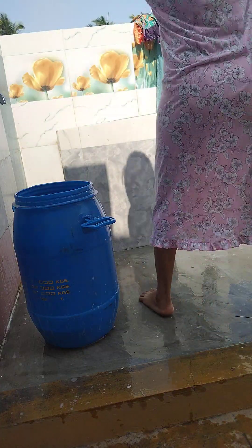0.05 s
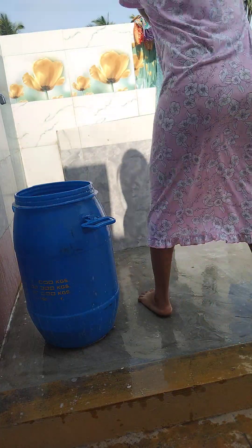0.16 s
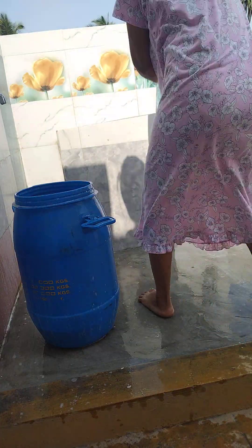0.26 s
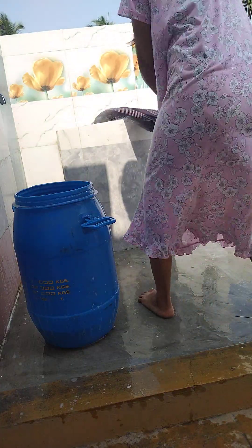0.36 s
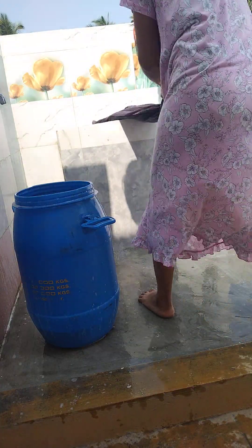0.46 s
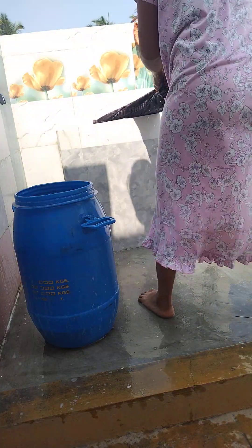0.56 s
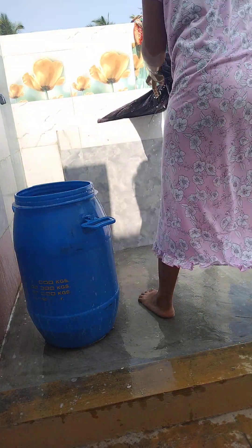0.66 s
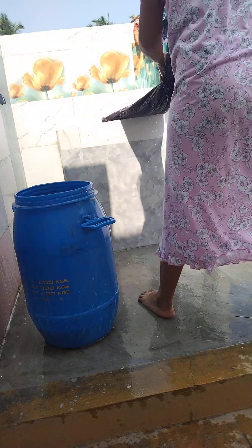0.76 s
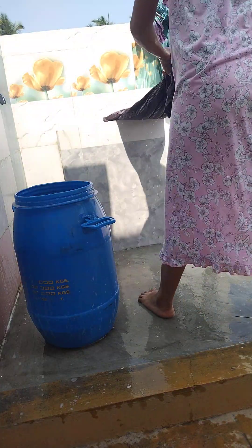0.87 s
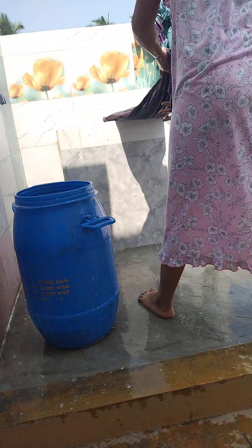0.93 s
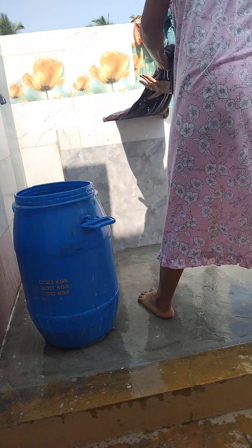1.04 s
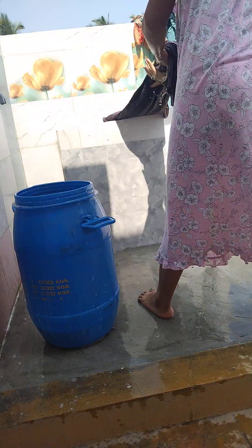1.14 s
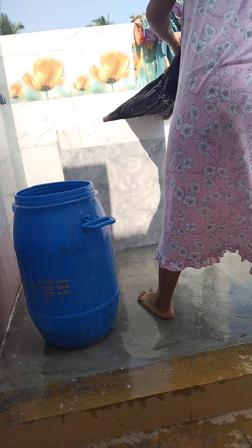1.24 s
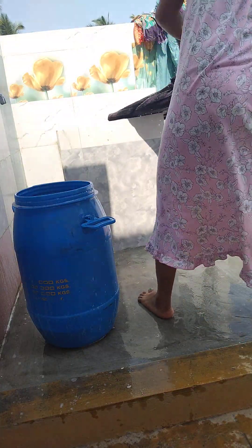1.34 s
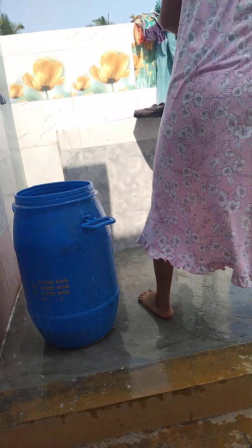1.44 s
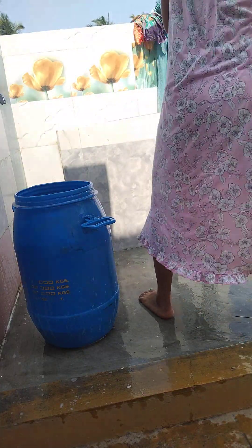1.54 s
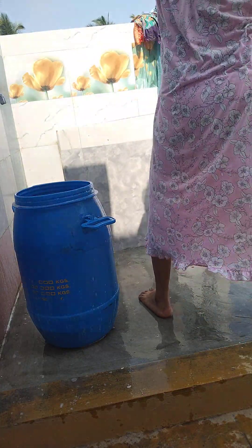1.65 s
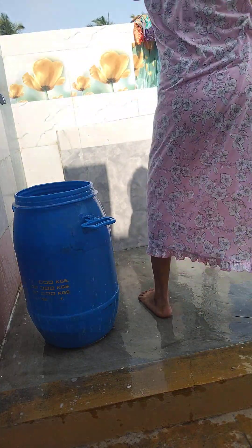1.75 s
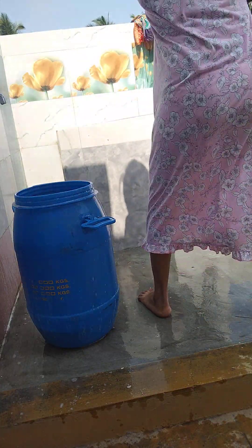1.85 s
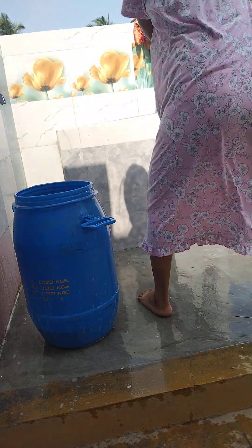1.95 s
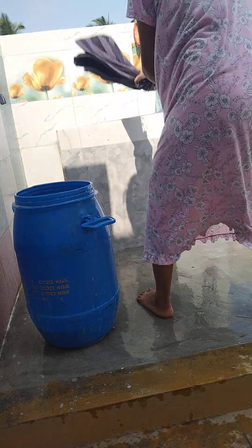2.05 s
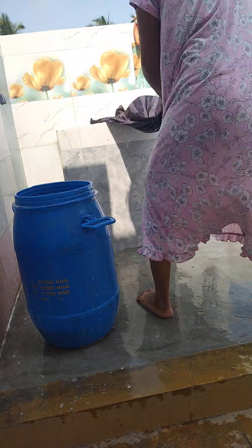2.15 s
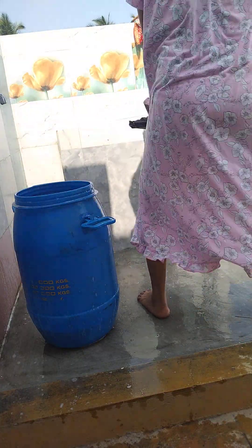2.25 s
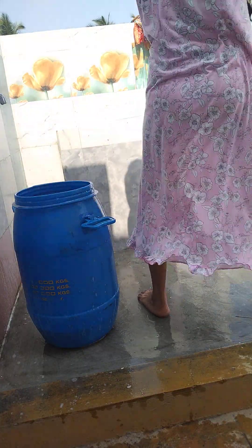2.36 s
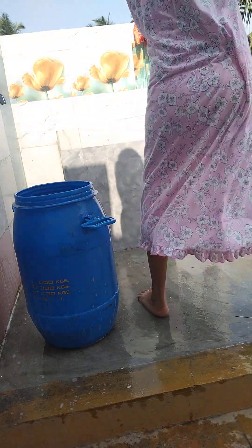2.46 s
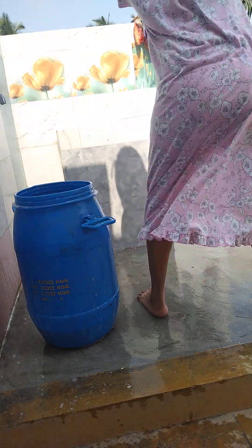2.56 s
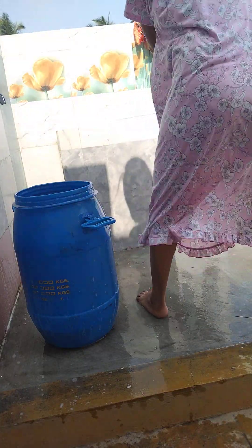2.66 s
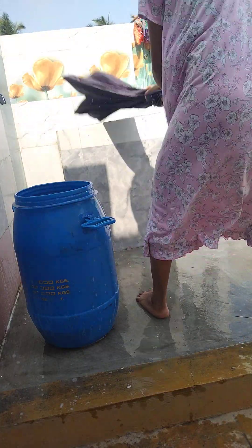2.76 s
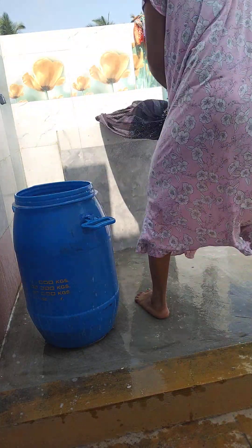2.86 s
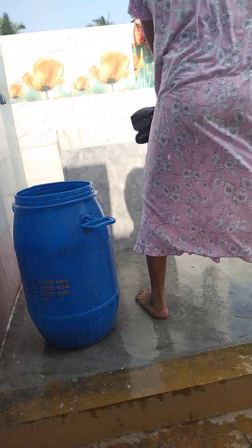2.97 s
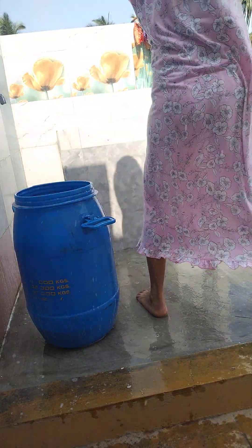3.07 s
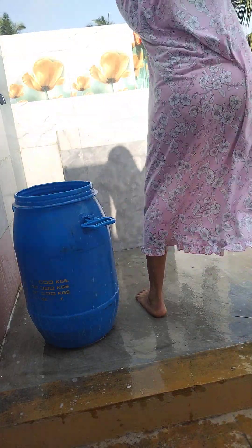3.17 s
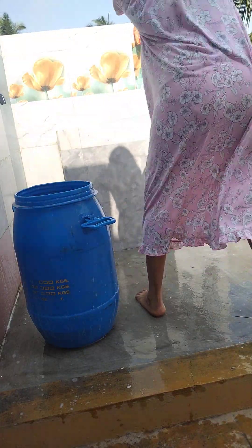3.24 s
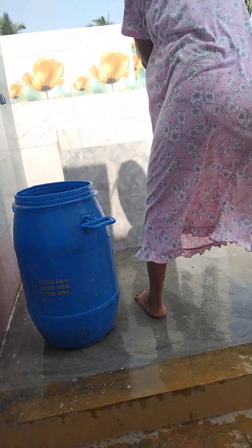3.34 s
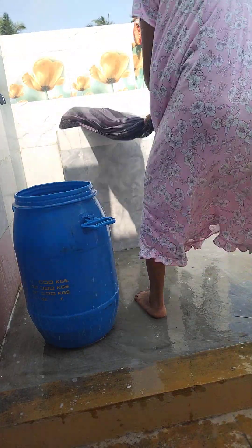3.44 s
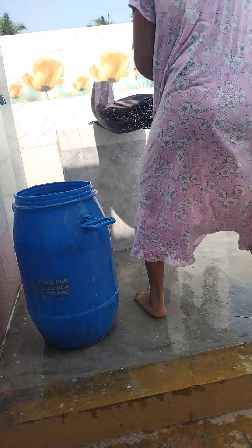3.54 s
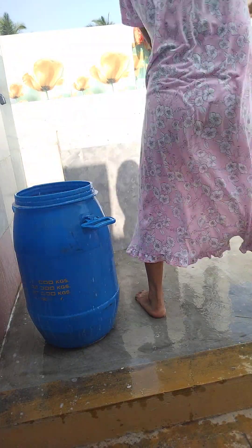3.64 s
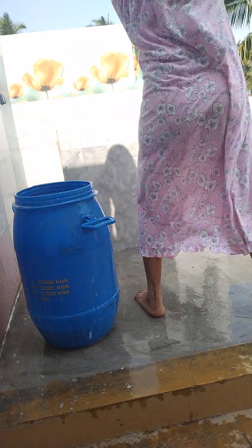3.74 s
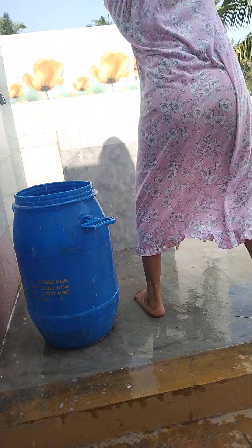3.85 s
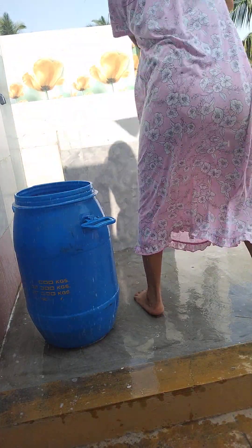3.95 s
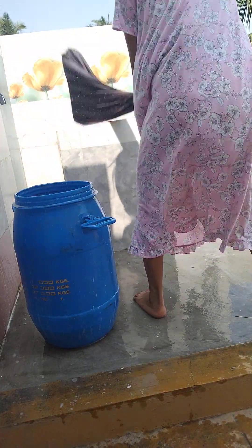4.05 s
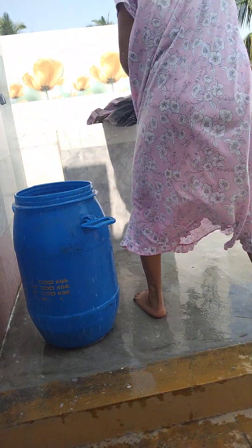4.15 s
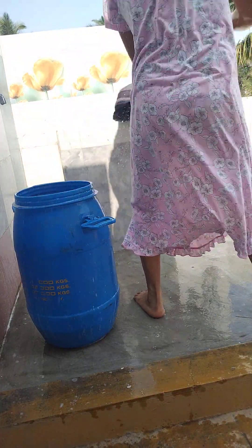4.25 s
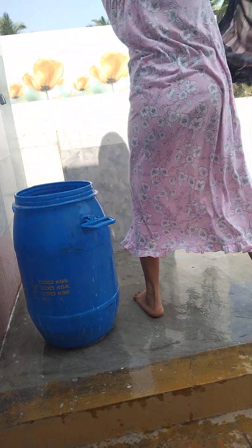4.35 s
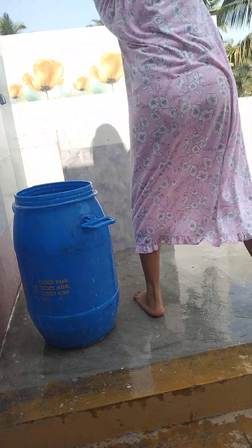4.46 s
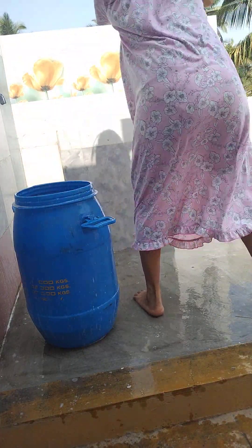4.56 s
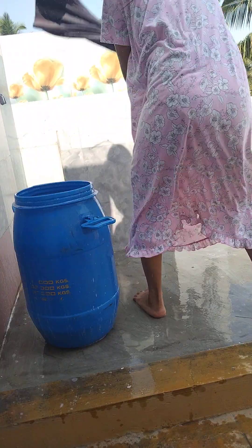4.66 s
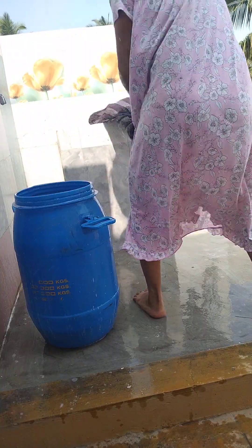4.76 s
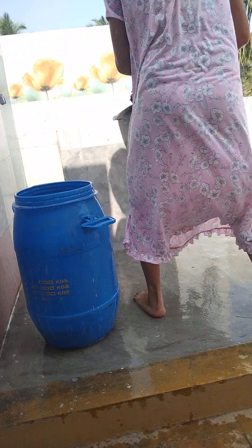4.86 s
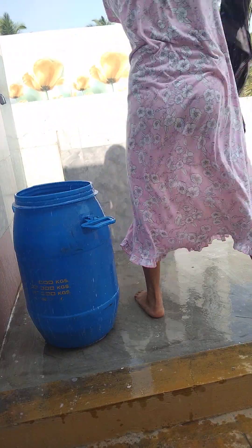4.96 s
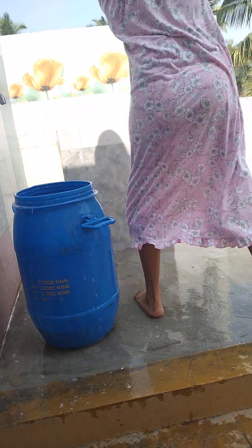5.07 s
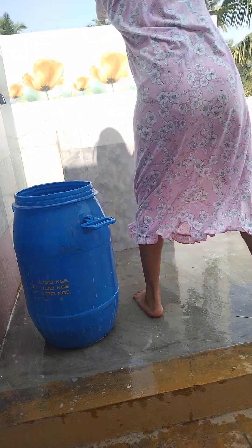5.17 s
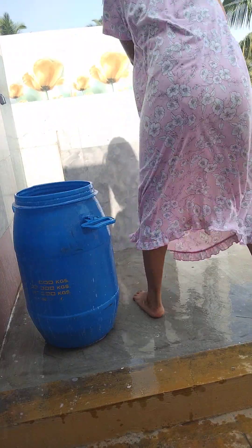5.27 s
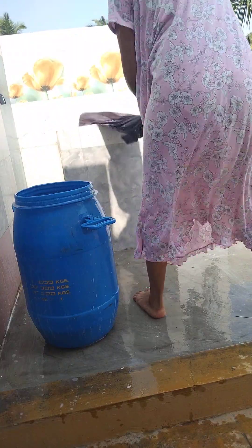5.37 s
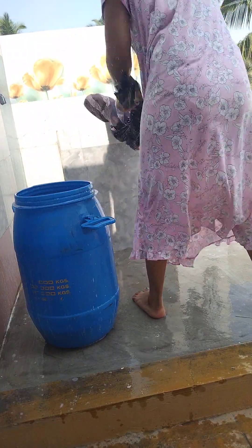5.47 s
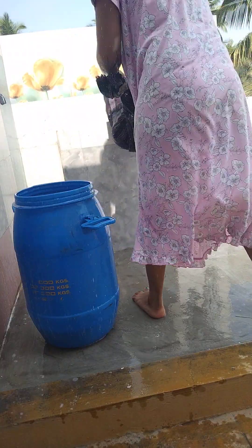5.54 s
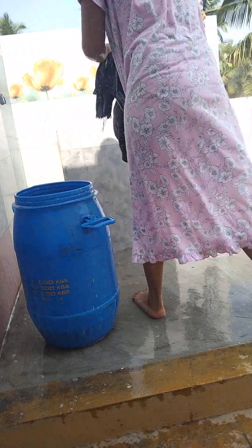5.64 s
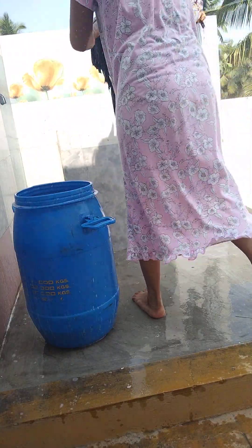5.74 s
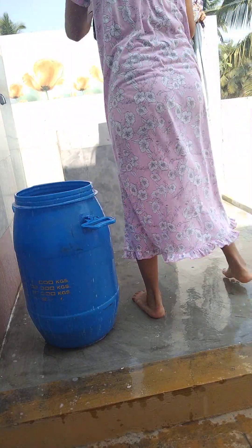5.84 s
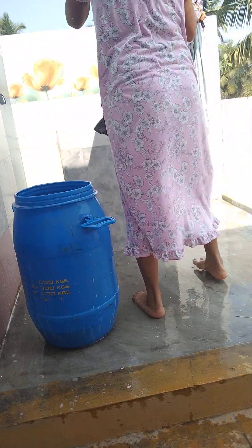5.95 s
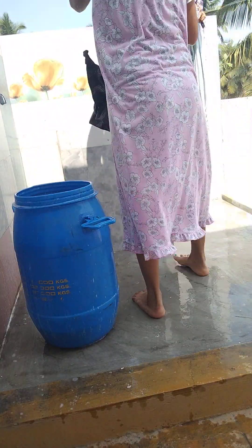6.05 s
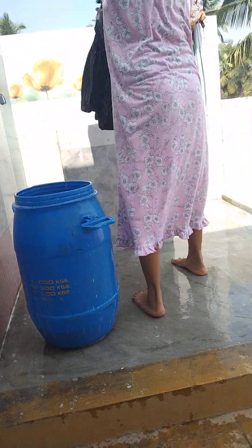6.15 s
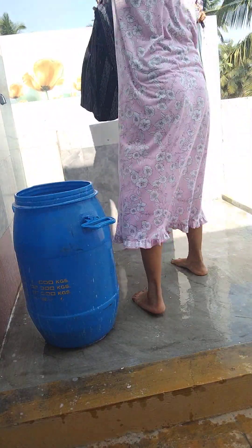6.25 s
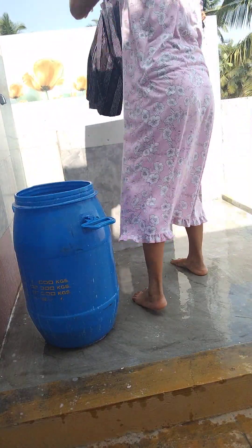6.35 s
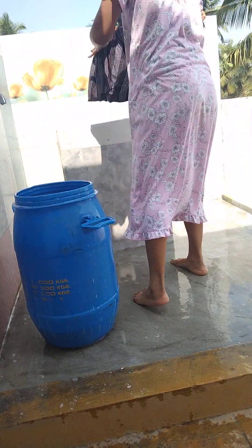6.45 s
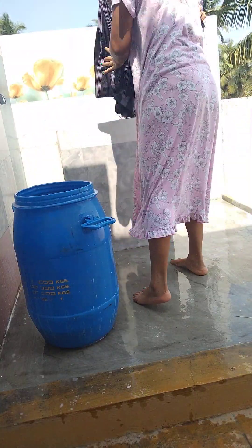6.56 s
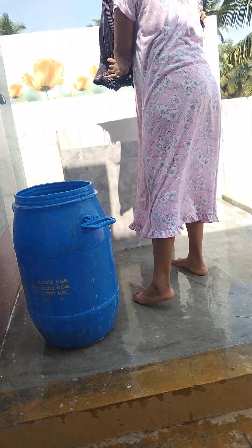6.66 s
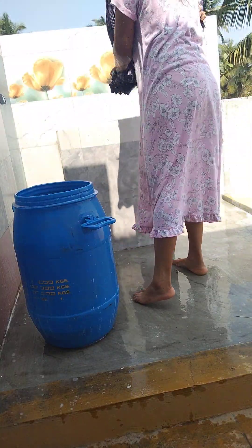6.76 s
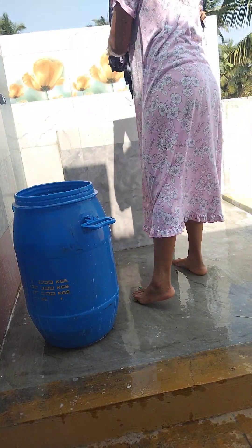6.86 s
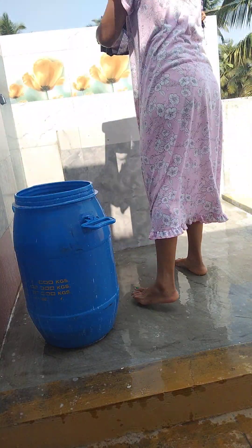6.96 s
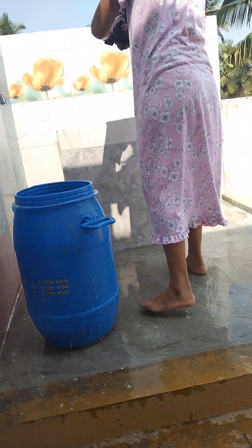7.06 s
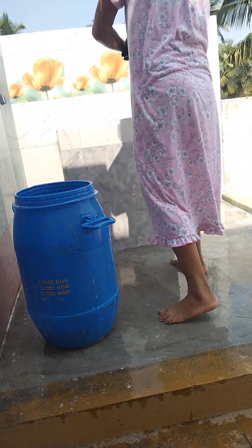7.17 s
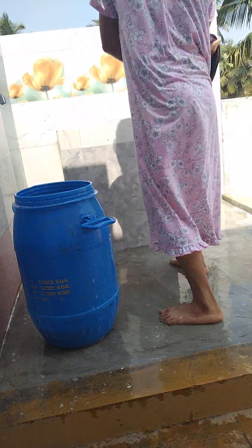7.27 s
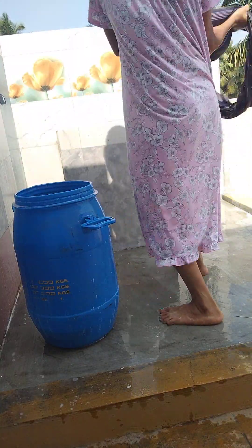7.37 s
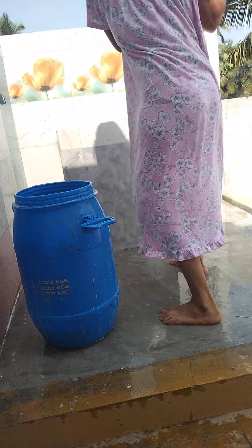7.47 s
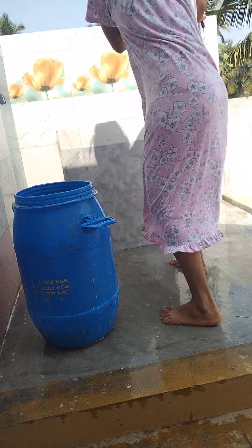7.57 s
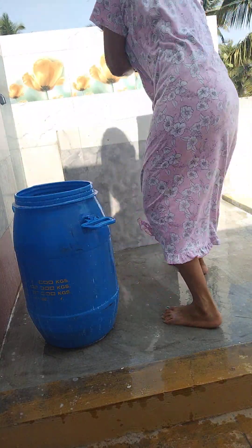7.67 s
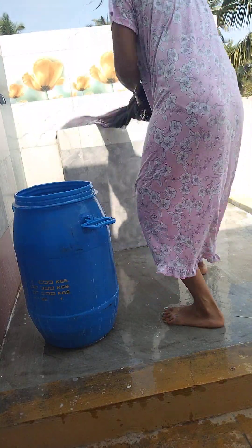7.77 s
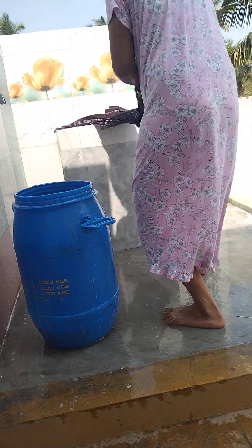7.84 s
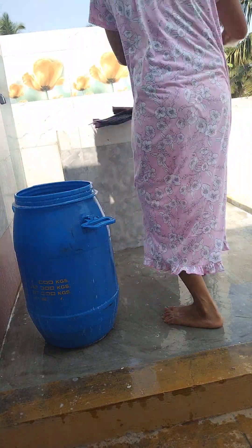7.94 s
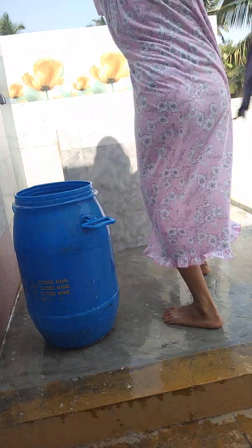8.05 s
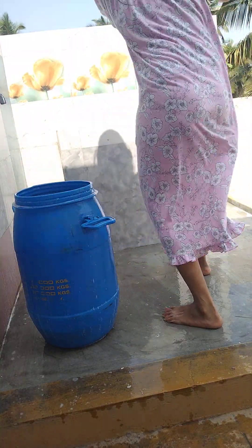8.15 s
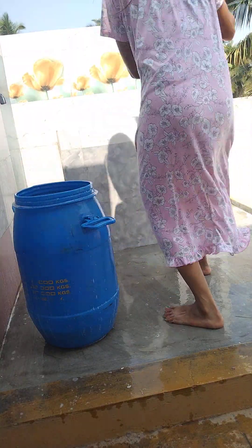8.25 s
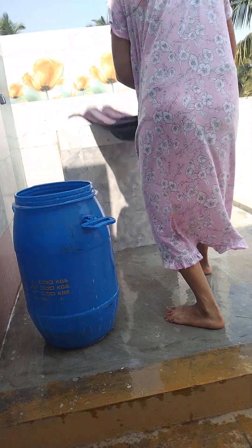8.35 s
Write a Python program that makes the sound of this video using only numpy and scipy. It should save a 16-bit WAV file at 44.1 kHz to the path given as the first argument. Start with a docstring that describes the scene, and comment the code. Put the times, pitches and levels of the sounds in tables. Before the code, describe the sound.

Wet cloth is slapped against a stone slab in a walled outdoor corner. One blow comes first, then after a gap six follow at an even pace, each a close smack with a thud, spray and a short echo. The cloth rustles and drips between them. In a pause with soft pats, a faint distant engine speeds up and settles, before one last slap.

```python
"""A distant engine hums under faint warbling hiss; then wet cloth rustles in and slaps on a stone
washing slab in a walled corner. Each blow squeezes out air and spray; the walls answer and an open
plastic barrel booms. The cloth drags back over the stone and sheds drips, with soft pats of cloth and
bare feet between blows. Late on, the engine speeds up and drops back to idle."""
import sys
import numpy as np
from scipy import signal
from scipy.fft import rfft, irfft, next_fast_len
from scipy.io import wavfile
from scipy.ndimage import uniform_filter1d, map_coordinates

SR = 44100
rng = np.random.default_rng(int(sys.argv[2]) if len(sys.argv) > 2 else 0)


def wav_out(sig):
    """Save sig, one row per channel (or a flat mono array), as 16-bit PCM at SR to the path in sys.argv[1]."""
    wavfile.write(sys.argv[1], SR, np.round(np.clip(np.atleast_2d(sig).T, -1, 1) * 32767).astype(np.int16))


N = 370881
CLOCK_S = np.arange(N) / SR
AGE_S = np.arange(SR) / SR  # time within one event
BINS_HZ = np.fft.rfftfreq(2 * SR, 1 / SR)


def amp(db):
    return 10 ** (np.asarray(db) / 20)


def unit_rms(x):
    return x / np.sqrt(np.mean(x ** 2) + 1e-20)


def along(points, hz):
    """Interpolate (freq_hz, value) rows on a log axis."""
    freqs, values = np.transpose(points)
    return np.interp(np.log(hz + 1), np.log(freqs + 1), values)


def curves(rows):
    """Per-sample curve for each column after time_s."""
    times, *columns = np.transpose(rows)
    return [np.interp(CLOCK_S, times, column) for column in columns]


def wobble(rate_hz, size=N):
    """Smooth random curve."""
    knots = rng.standard_normal(int(size * rate_hz / SR) + 4)
    return map_coordinates(knots, [np.arange(size) * rate_hz / SR])


def fade(t, t60_s):
    return np.exp(-np.log(1000) * np.maximum(t, 0) / t60_s)


def peak_db(hz, centre_hz, width_hz, gain_db):
    return gain_db / (1 + (2 * (hz - centre_hz) / width_hz) ** 2)


def add(track, start_s, sound):
    part = track[max(round(start_s * SR), 0):][:len(sound)]
    part += sound[:len(part)]


def filtered(x, gain_at_hz):
    size = next_fast_len(N + SR // 2)
    return irfft(rfft(x, size) * gain_at_hz(np.fft.rfftfreq(size, 1 / SR)), size)[:N]


def burst(drive, colour_db):
    """Minimum-phase filtered drive, scaled to the energy of 15 ms at rms 1."""
    cepstrum = irfft(np.log(amp(colour_db)))
    cepstrum[1:SR] *= 2
    cepstrum[SR + 1:] = 0
    x = irfft(rfft(drive, 2 * SR) * np.exp(rfft(cepstrum)))[:SR]
    return x * np.sqrt(.015 * SR / np.sum(x ** 2))


def crackle(clump_db, rate_hz, size=SR):
    """Noise in clumps: fold after fold, drop after drop."""
    return rng.standard_normal(size) * amp(clump_db * wobble(rate_hz, size))


def patchy(x, depth_db):
    """Shift the colour in narrow, short-lived patches."""
    spectra = signal.stft(x, nperseg=1024)[2]
    field = uniform_filter1d(rng.standard_normal(spectra.shape), size=4, axis=0)
    field = uniform_filter1d(field, size=9, axis=1)
    return signal.istft(spectra * amp(depth_db * unit_rms(field)), nperseg=1024)[1][:N]


def stroke(peak_s, rise_t60_s, hold_s, fall_t60_s):
    """Gesture envelope: swell, hold, decay."""
    return fade(peak_s - CLOCK_S, rise_t60_s) * fade(CLOCK_S - peak_s - hold_s, fall_t60_s)


# Exhaust spectrum: freq_hz, gain_db
EXHAUST_SPECTRUM = [(30, -34), (55, -25.5), (70, -8), (100, -6), (135, 2.5), (165, -1), (195, -7),
                    (240, -21), (350, -38), (600, -58.5)]
# Engine run: time_s, firing_hz, level_db
ENGINE_RUN = [(0, 26.4, -57.5), (.3, 26.5, -67), (.7, 25.6, -48.5), (1.02, 25.1, -65.5),
              (1.18, 25.1, -49.5), (1.45, 24.3, -59), (1.85, 23.5, -56), (2.1, 24.5, -53.5),
              (3.3, 29.2, -54.5), (3.9, 27.1, -51), (5.85, 30.9, -53), (6.04, 31.6, -44.5),
              (6.48, 33.4, -41.5), (6.8, 27, -53.5), (7.25, 26.4, -59.5), (7.65, 26.5, -52),
              (8.41, 26.6, -58.5)]


def engine(waver_db=4.0, rumble_db=-8, pitch_waver=.004, load_hz=(30, 31.4), load_boom_db=5.88):
    """Exhaust orders, dulled by distance, waver over a rumble; fast firing adds a deep boom."""
    firing_hz, level_db = curves(ENGINE_RUN)
    boom_db = np.interp(firing_hz, load_hz, [0, load_boom_db])
    firings = np.cumsum(firing_hz * (1 + pitch_waver * wobble(12))) / SR
    note = np.zeros(N)
    for order in range(2, 12):
        hz = order * firing_hz
        order_db = along(EXHAUST_SPECTRUM, hz) + peak_db(hz, 62, 45, boom_db) + waver_db * wobble(7)
        note += amp(order_db) * np.sin(2 * np.pi * (order * firings + rng.uniform()))
    rumble = filtered(rng.standard_normal(N), lambda hz: amp(along(EXHAUST_SPECTRUM, hz)))
    return amp(level_db) * unit_rms(unit_rms(note) + amp(rumble_db) * unit_rms(rumble))


# Narrow hiss bands: centre_hz, width_hz, relative_db
HISS_BANDS = [(454, 39, -9.5), (1080, 110, -4), (1390, 170, -0.5), (1650, 130, -4.5), (2295, 110, -1.5),
              (2880, 210, -10), (3550, 400, -9.5), (4400, 1200, -7.5)]
# Their joint level: time_s, level_db
HISS_LEVEL = [(0, -69.5), (.5, -63.5), (1.03, -87), (1.35, -68.5), (3.4, -85), (4.5, -62.5), (5.8, -70.5),
              (6.4, -62), (6.95, -72.5), (7.45, -76), (8.41, -57)]


def warbling_hiss(waver_db=4):
    """Faint narrow bands of background hiss waver, like a noise suppressor's warble."""
    hiss = np.zeros(N)
    for centre_hz, width_hz, relative_db in HISS_BANDS:
        gain = amp(relative_db + waver_db * wobble(3.6))
        noise = rng.standard_normal(N)
        band = filtered(noise, lambda hz: 1 / (1 + (2 * (hz - centre_hz) / width_hz) ** 4))
        hiss += gain * unit_rms(band)
    return amp(curves(HISS_LEVEL)[0]) * unit_rms(hiss)


# Corner resonances: centre_hz, width_hz, gain_db
CORNER_MODES = [(247, 30, 8.5), (303, 18, 4), (357.8, 40, 8), (427, 20, 5), (472, 26, 9.5), (531, 29, 5.5),
                (615, 22, 4), (795, 47, 3), (917, 50, 2.5), (1324, 130, 5.5), (2145, 53, 4),
                (2665, 60, 4.5), (3000, 78, 3.5), (3320, 220, 6.5)]


def corner_db(hz):
    """The corner around the slab lifts its resonant frequencies."""
    return sum(peak_db(hz, *mode) for mode in CORNER_MODES)


# Spectra of rubbing folds and wet weave: freq_hz, gain_db
RUSTLE_SPECTRUM = [(120, -16), (280, 9.5), (450, 11), (750, -7.5), (1000, 7), (1400, 1.5), (2300, -4.5),
                   (4000, -14.5), (8000, -31.5)]
FIZZ_SPECTRUM = [(1500, 2), (4000, -1.5), (6000, -2), (8000, -0.5), (10000, -15.5), (15500, -12.5)]
# Cloth gathered or pulled: peak_s, hold_s, rustle_db, fizz_db
PULLS = [(1.48, 0.06, -70, -56), (1.83, 0.18, -66.5, -85.5), (2.552, .07, -55.5, -61.5),
         (4.537, 0.16, -52, -64), (5.098, 0.23, -49.5, -70.5), (5.854, 0.043, -48, -68),
         (6.232, 0.27, -57, -70), (6.72, .04, -65, -63.5), (7.6, 0.029, -64, -62.5),
         (8.286, 0.07, -54, -64)]


def cloth_handling(swing_rustle_db=-52, swing_fizz_db=-65, hiss_floor_db=-73, lead_s=.025):
    """Folds rub as the cloth is swung, dragged and gathered; water fizzes out of the weave."""
    swings = [stroke(start_s - lead_s, rise_t60_s=.28, hold_s=.27, fall_t60_s=.43)
              for start_s, *_ in BLOWS]
    swing = np.max(swings, axis=0)
    rubbing = amp(swing_rustle_db) * swing
    wetness = np.maximum(amp(swing_fizz_db) * swing, amp(hiss_floor_db))
    for peak_s, hold_s, rustle_db, fizz_db in PULLS:
        pull = stroke(peak_s, rise_t60_s=.43, hold_s=hold_s, fall_t60_s=.28)
        rubbing = np.hypot(rubbing, amp(rustle_db) * pull)
        wetness = np.hypot(wetness, amp(fizz_db) * pull)
    folds = patchy(crackle(3.5, 90, N), depth_db=5.5)
    rustle = unit_rms(filtered(folds, lambda hz: amp(along(RUSTLE_SPECTRUM, hz) + corner_db(hz))))
    water = patchy(crackle(2.1, 490, N), depth_db=4.5)
    fizz = unit_rms(filtered(water, lambda hz: amp(along(FIZZ_SPECTRUM, hz))))
    return rubbing * amp(.42 * wobble(16)) * rustle + wetness * amp(.8 * wobble(20)) * fizz


def wet_contacts(rows, attack_s, slope_db_per_octave, plop_db, clump_db, walls_db):
    """Small wet contacts: clumpy bursts with a plop at the centre frequency, answered by the walls."""
    out = np.zeros(N)
    for start_s, level_db, centre_hz, t60_s in rows:
        octaves_off = np.hypot(np.log2((BINS_HZ + 1) / centre_hz), .25)
        plop = peak_db(BINS_HZ, centre_hz, .31 * centre_hz, plop_db)
        colour_db = plop - slope_db_per_octave * octaves_off
        drive = crackle(clump_db, 600) * (1 - np.exp(-AGE_S / attack_s)) * fade(AGE_S, t60_s)
        add(out, start_s, amp(level_db) * (burst(drive, colour_db) + amp(walls_db) * walls(colour_db)))
    return out


# Soft contacts: start_s, level_db, centre_hz, t60_s
SOFT_PATS = [(.348, -51.5, 442, 0.54), (1.118, -59, 2050, 0.15), (1.255, -59.5, 480, 0.19),
             (1.746, -47, 546, 0.5), (2.583, -41, 1050, 0.2), (2.840, -43.5, 510, 0.17),
             (3.385, -54.5, 416, .21), (3.511, -51, 520, .08), (3.867, -47, 930, 0.069),
             (3.955, -47.5, 520, 0.16), (4.543, -44.5, 466, 0.053), (4.718, -38.5, 436, 0.074),
             (5.086, -36.5, 730, 0.16), (5.387, -44.5, 480, 0.12), (5.409, -39.5, 870, .1),
             (5.437, -33, 820, 0.058), (5.895, -48, 446, 0.13), (6.716, -38.5, 425, 0.12),
             (6.718, -45, 1310, .06), (7.535, -58.5, 1410, 0.073), (7.587, -40.5, 950, 0.068),
             (7.642, -47.5, 880, .06)]


def pats():
    """Wet cloth and bare feet land softly."""
    return wet_contacts(SOFT_PATS, attack_s=.0017, slope_db_per_octave=10.5,
                        plop_db=6, clump_db=3, walls_db=-3.5)


# Wall reverberation: freq_hz, t60_s
WALL_DECAY = [(80, .7), (210, 0.59), (560, 0.46), (1500, 0.51), (4000, 0.46), (10000, 0.67)]
# Wall reflection: freq_hz, gain_db
WALL_REFLECTION = [(100, 1.5), (200, 0.5), (350, 1), (800, -2), (2000, -1), (5000, 0), (12000, -8.5)]


def walls(colour_db, delay_s=0, build_s=.012, echo_s=.12, echo_width_s=.014, echo_db=3):
    """A burst's diffuse tail, swelling once more as the far wall returns it."""
    hz, frame_s, spectra = signal.stft(rng.standard_normal(SR), SR, nperseg=256)
    decay = fade(frame_s, along(WALL_DECAY, hz)[:, None])
    tail = signal.istft(spectra * decay, SR, nperseg=256)[1][:SR]
    t = np.maximum(AGE_S - delay_s, 0)
    build = 1 - np.exp(-(t / build_s) ** 2)
    echo = amp(echo_db * np.exp(-((t - echo_s) / echo_width_s) ** 2))
    tail = burst(tail * build * echo, colour_db)
    return irfft(rfft(tail, 2 * SR) * amp(along(WALL_REFLECTION, BINS_HZ)))[:SR]


# Spectra of cloth weight, squeezed air, wet surface and flying water: freq_hz, gain_db
THUD_SPECTRUM = [(20, -44.5), (45, -30), (70, -8.5), (110, -2.5), (170, -0.5), (230, -11.5), (400, -35.5),
                 (1500, -82.5)]
CLAP_SPECTRUM = [(80, -40.5), (190, -16.5), (250, -2.5), (450, -1), (800, 3.5), (1050, -7), (1600, -29.5),
                 (5000, -80)]
SMACK_SPECTRUM = [(300, -38), (800, -5.5), (1200, 2), (1700, 0), (2500, -4.5), (3400, -14), (4500, -18.5),
                  (9000, -42.5)]
SPRAY_SPECTRUM = [(1500, -18.5), (3800, 2), (5000, -1), (6400, -0.5), (7900, 5), (9500, -6.5), (12500, -9),
                  (15500, -4.5)]
# Cloth on stone: start_s, thud_db, clap_db, clap_hz, smack_db, spray_db, base_t60_s,
# hem_db, pocket_hz, pocket_db, barrel_db, walls_db
BLOWS = [(.461, -25.5, -18, 460, -16, -32.5, .08, -7.5, 790, -16.5, -29, -2.5),
         (.561, -32.5, -29, 716, -28, -41, 0.32, -4, 185, -24, -38.5, -10.5),
         (2.187, -24, -14, 550, -15, -23.5, .11, -29, 439.7, -9.5, -28, -3),
         (2.907, -16, -9.5, 532.6, -16.5, -26, .08, -21.5, 249, -3, -34, -6.5),
         (3.554, -33, -18, 648, -20.5, -35.5, 0.04, -5, 245, -9, -22.5, 0),
         (4.180, -22.5, -15.5, 814, -19, -28.5, 0.11, -22.5, 115, -21, -18, -5.5),
         (4.823, -25.5, -14, 463, -19, -32, 0.078, -9, 381.4, -12.5, -20, -2.5),
         (5.470, -28.5, -17, 814, -19, -33.5, 0.06, -14, 363, -17.5, -26.5, 0),
         (7.888, -20.5, -16.5, 411, -19.5, -30.5, .05, -10, 248.7, -17, -42, -12),
         (7.901, -27, -18.5, 467, -23, -31.5, 0.078, -13, 474.4, -12.5, -20.5, -1.5)]


def slaps(hem_lead_s=.008, spread_s=.0061, thud_hz=118, crack_over_smack_db=7, corner_in_tail=.71):
    """The hem touches first; then the wet mass lands, traps air and throws spray."""
    out = np.zeros(N)
    t = AGE_S - hem_lead_s
    landed_s = np.maximum(t, 0)
    corner = corner_db(BINS_HZ)
    for (start_s, thud_db, clap_db, clap_hz, smack_db, spray_db, base_t60_s,
         hem_db, pocket_hz, pocket_db, barrel_db, walls_db) in BLOWS:
        landing = np.where(t < 0, amp(hem_db) * AGE_S / hem_lead_s, 1)
        thud = crackle(2, 300) * fade(t, .47 * base_t60_s)
        clap = crackle(2.6, 700) * fade(t - 1.8 * spread_s, 1.2 * base_t60_s)
        smack = crackle(3.2, 900) * fade(t - spread_s, .86 * base_t60_s)
        spray = crackle(1.8, 1300) * fade(t - .3 * spread_s, 1.05 * base_t60_s)
        layers = [(thud_db, thud, along(THUD_SPECTRUM, BINS_HZ) + peak_db(BINS_HZ, thud_hz, 24, 7)),
                  (clap_db, clap, along(CLAP_SPECTRUM, BINS_HZ) + peak_db(BINS_HZ, clap_hz, 130, 5)),
                  (smack_db, smack, along(SMACK_SPECTRUM, BINS_HZ)),
                  (spray_db, spray, along(SPRAY_SPECTRUM, BINS_HZ))]
        blow = np.zeros(SR)
        for level_db, drive, colour_db in layers:
            direct = burst(drive * landing, colour_db + corner)
            tail = walls(colour_db + corner_in_tail * corner, hem_lead_s)
            blow += amp(level_db) * (direct + amp(walls_db) * tail)
        blow += air_pocket(landed_s, pocket_hz, pocket_db, smack_db + crack_over_smack_db)
        blow += amp(barrel_db) * barrel(landed_s)
        add(out, start_s - hem_lead_s, blow)
    return out


def air_pocket(t, pitch_hz, ring_db, crack_db, t60_s=.1, crack_s=.00018):
    """Air caught under the cloth rings briefly and cracks out, fold by fold."""
    sound = amp(ring_db) * np.sin(2 * np.pi * pitch_hz * t) * fade(t, t60_s) * (1 - np.exp(-t / .004))
    for fold in range(3):
        onset_s = .002 + fold * rng.uniform(.0024, .0076)
        progress = np.maximum(t - onset_s, 0) / crack_s
        sound += amp(crack_db - 4 * fold) * (progress > 0) * (1 - progress) * np.exp(-progress)
    return sound


# Barrel air modes: pitch_hz, level_db, t60_s
BARREL_MODES = [(166.8, 7.5, 0.45), (123.5, -5.5, 0.55), (228.3, -7.5, 0.56), (331, -9, 0.57)]


def barrel(t, rise_s=.068):
    """Air in the open barrel takes a moment to swing up, then booms."""
    boom = sum(amp(level_db) * np.sin(2 * np.pi * (pitch_hz * t + rng.uniform())) * fade(t, t60_s)
               for pitch_hz, level_db, t60_s in BARREL_MODES)
    return boom * (1 - np.exp(-t / rise_s))


def hollow_folds(t60_s=.15, rise_s=.0071, waver_rad=.3):
    """Air trapped in the folds gives each clap a short hollow pitch."""
    out = np.zeros(N)
    envelope = (1 - np.exp(-(AGE_S / rise_s) ** 2)) * fade(AGE_S, t60_s)
    for start_s, _, clap_db, clap_hz, *_ in BLOWS:
        ring = np.sin(2 * np.pi * clap_hz * AGE_S + waver_rad * wobble(110, SR))
        add(out, start_s, amp(clap_db) * ring * envelope)
    return out


# Droplet spectrum: freq_hz, gain_db
DROPLET_SPECTRUM = [(1500, -27.5), (3500, -9), (5500, -6.5), (7800, 3), (10000, -6.5), (15500, 2)]


def spatter(peak_drops_per_s=200, peak_s=.13, size_spread_db=5, relative_db=-20):
    """Water thrown up by each blow patters down, thinning out as it falls."""
    out = np.zeros(N)
    drops_per_s = peak_drops_per_s * AGE_S / peak_s * np.exp(1 - AGE_S / peak_s)
    for start_s, _, _, _, _, spray_db, *_ in BLOWS:
        hits = rng.random(SR) < drops_per_s / SR
        drops = hits * amp(size_spread_db * rng.standard_normal(SR)) * fade(AGE_S, 1.2)
        splash = rng.standard_normal(SR) * fade(AGE_S, .015)
        patter = burst(signal.fftconvolve(drops, splash)[:SR], along(DROPLET_SPECTRUM, BINS_HZ))
        add(out, start_s, amp(spray_db + relative_db) * patter)
    return out


# Larger flicks of water: start_s, level_db, centre_hz, t60_s
WATER_FLICKS = [(1.053, -53, 6730, 0.073), (1.682, -65.5, 10000, 0.088), (2.474, -53.5, 8340, 0.084),
                (2.847, -56.5, 3100, 0.09), (4.112, -62, 5100, .07), (4.685, -55.5, 6400, 0.068),
                (5.089, -49.5, 5560, 0.13), (5.440, -52.5, 6000, 0.14), (5.858, -58, 6600, 0.049),
                (6.199, -56, 5300, 0.018), (6.697, -56.5, 8000, 0.23), (7.251, -63.5, 5970, 0.071),
                (7.370, -56.5, 3000, .07), (7.590, -58, 4990, .05)]


def drips_and_flicks(drips_per_blow=2, after_s=(.32, .4), drip_db=-64, drip_hz=7300, t60_s=.046):
    """Small drops fall from the lifted cloth after each blow, among larger flicks of water."""
    drips = [(start_s + rng.uniform(*after_s), rng.normal(drip_db, 2.5),
              drip_hz * np.exp(.14 * rng.normal()), t60_s)
             for start_s, *_ in BLOWS for _ in range(drips_per_blow)]
    return wet_contacts(WATER_FLICKS + drips, attack_s=.00065, slope_db_per_octave=13.5,
                        plop_db=.5, clump_db=1.5, walls_db=-4)


def scene():
    """Mono mix: washing over the distant engine and faint hiss."""
    contacts = pats() + drips_and_flicks()
    blows = slaps() + hollow_folds() + spatter()
    return (contacts + blows + cloth_handling() + engine() + warbling_hiss())[None]


# Suppressor threshold per bin: freq_hz, level_db
GATE_THRESHOLD = [(60, -86), (130, -81.5), (280, -87), (700, -91), (1400, -88.5), (2500, -91.5),
                  (4000, -100), (8000, -104), (11000, -112)]


def noise_suppressor(x, depth_db=-17, knee=.73):
    """Turns each band down while it is below its threshold."""
    hz, _, spectra = signal.stft(x, SR, nperseg=512, noverlap=384)
    power = uniform_filter1d(np.abs(spectra) ** 2, size=3, axis=0)
    power = np.abs(uniform_filter1d(power, size=9, axis=1))
    excess = (power / amp(along(GATE_THRESHOLD, hz))[:, None] ** 2) ** knee
    gain = (amp(depth_db) + excess) / (1 + excess)
    return signal.istft(spectra * gain, SR, nperseg=512, noverlap=384)[1][:N]


def record(dry, ceiling=.68, cutoff_hz=15800):
    """Noise suppression, soft clipping, steep low-pass."""
    gated = noise_suppressor(dry[0])
    rounded = gated / (1 + np.abs(gated / ceiling) ** 8) ** (1 / 8)
    return filtered(rounded, lambda hz: 1 / (1 + (hz / cutoff_hz) ** 120))[None]


dry = scene()
out = record(dry)
wav_out(out)
```